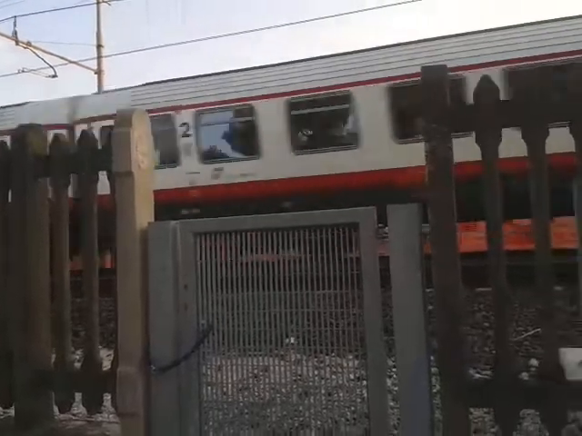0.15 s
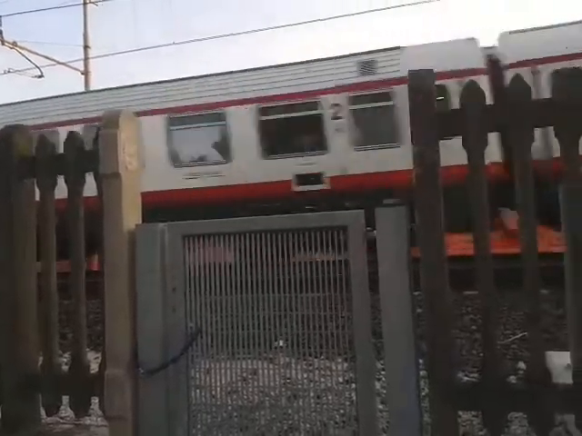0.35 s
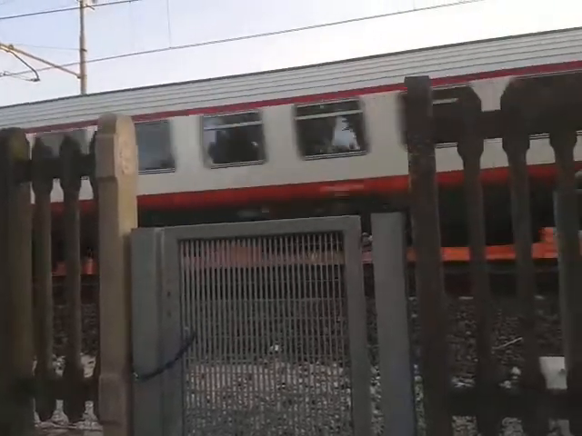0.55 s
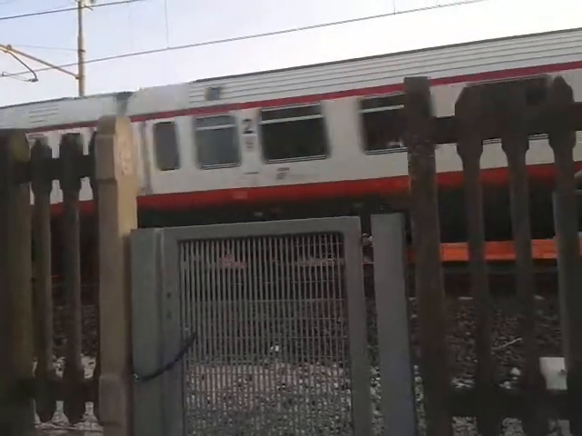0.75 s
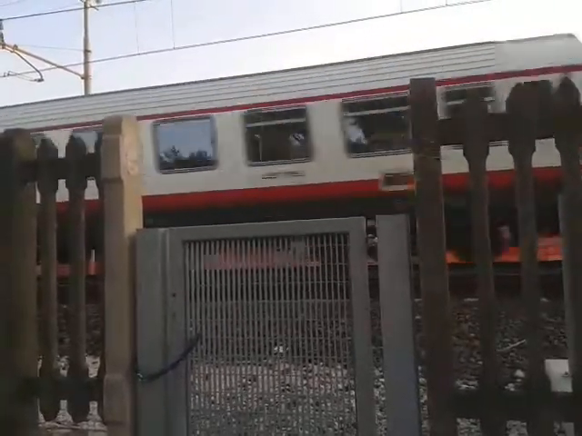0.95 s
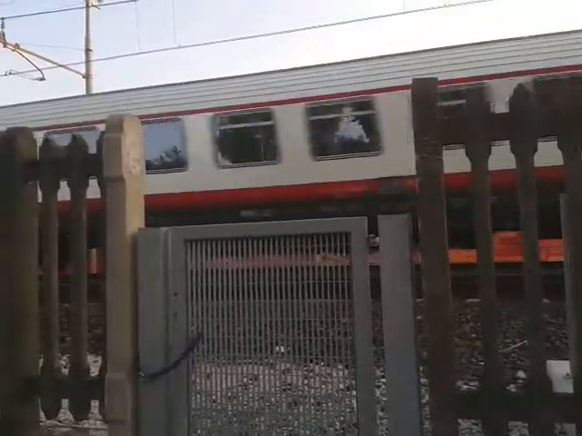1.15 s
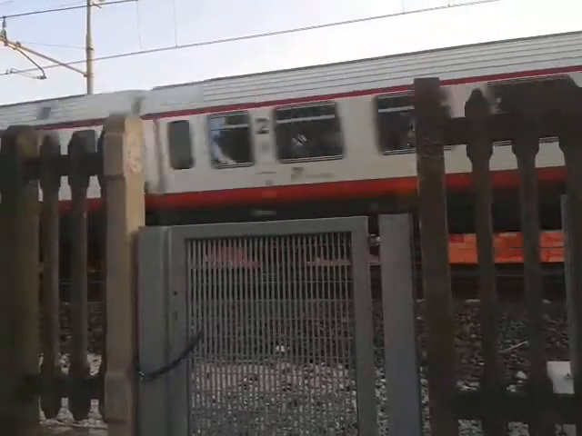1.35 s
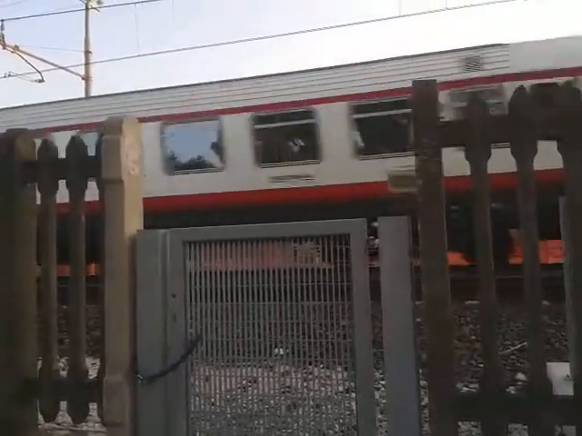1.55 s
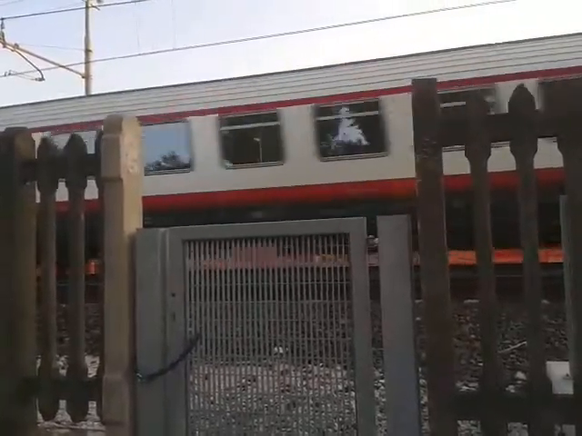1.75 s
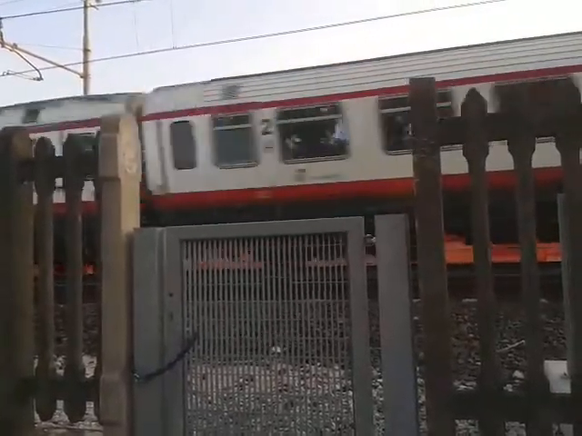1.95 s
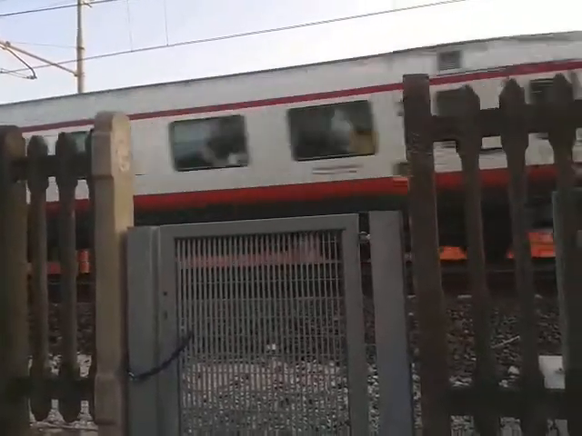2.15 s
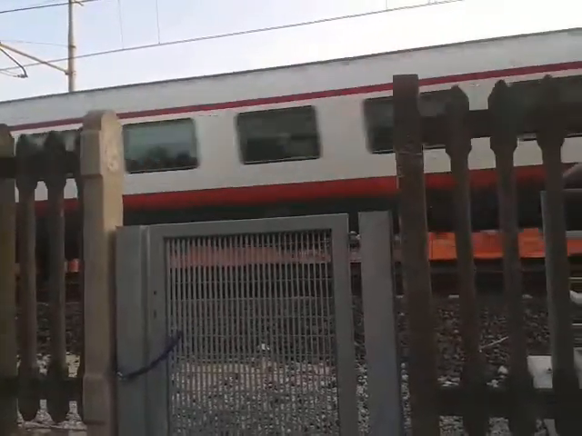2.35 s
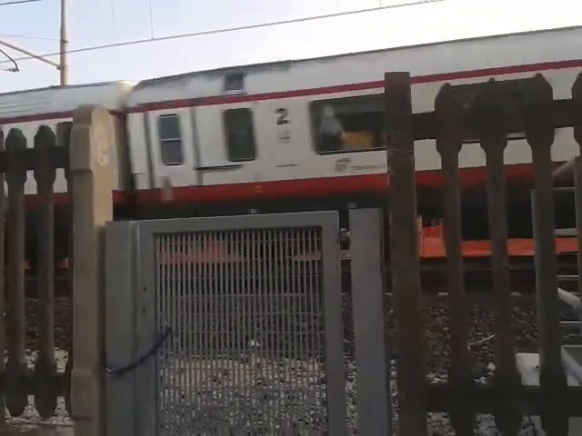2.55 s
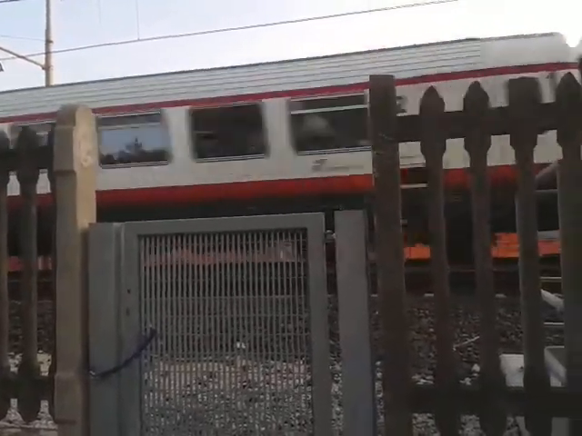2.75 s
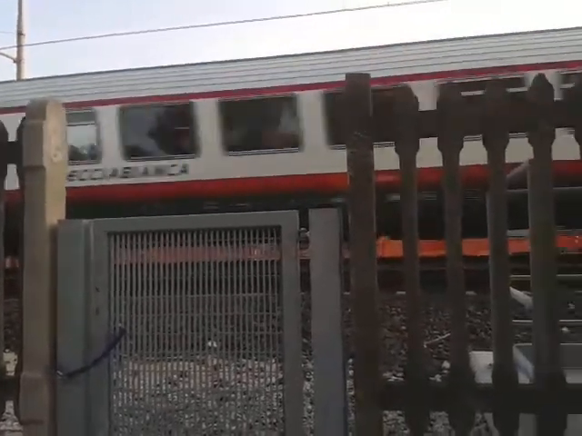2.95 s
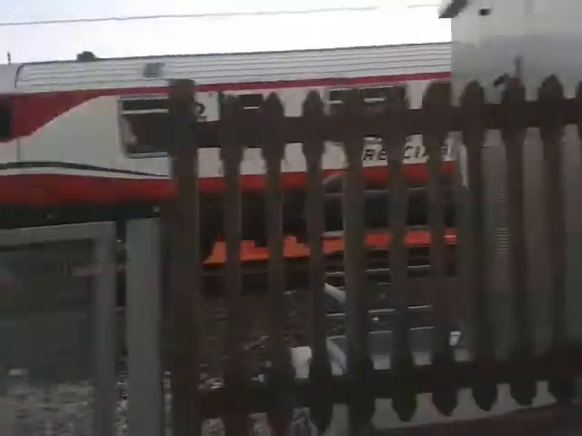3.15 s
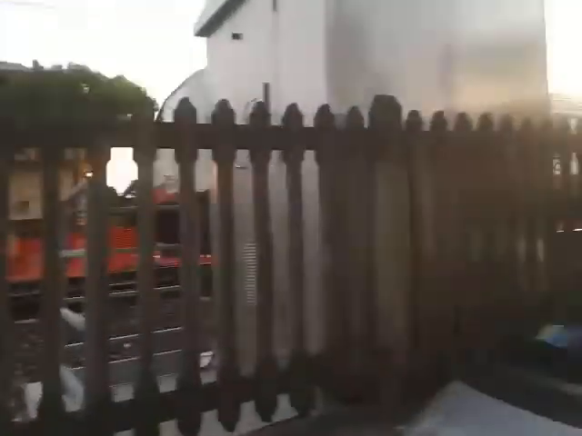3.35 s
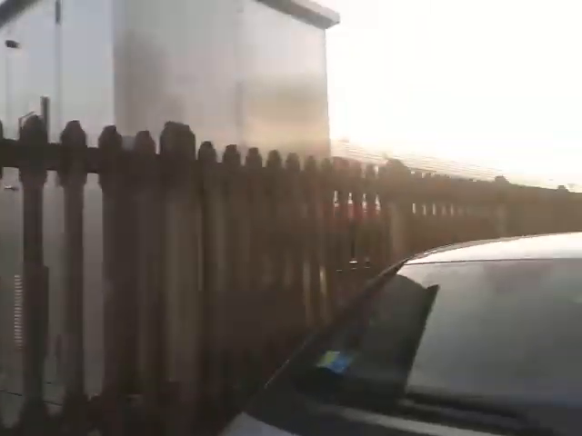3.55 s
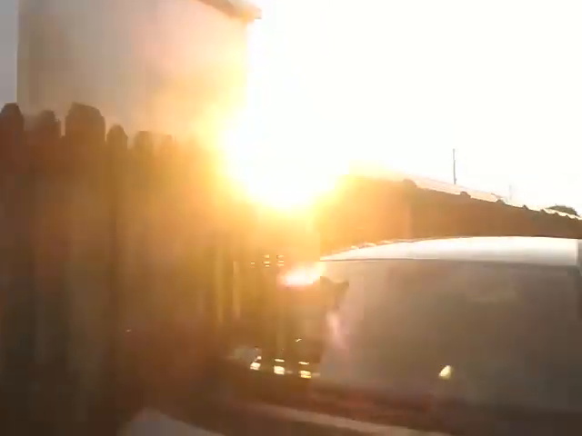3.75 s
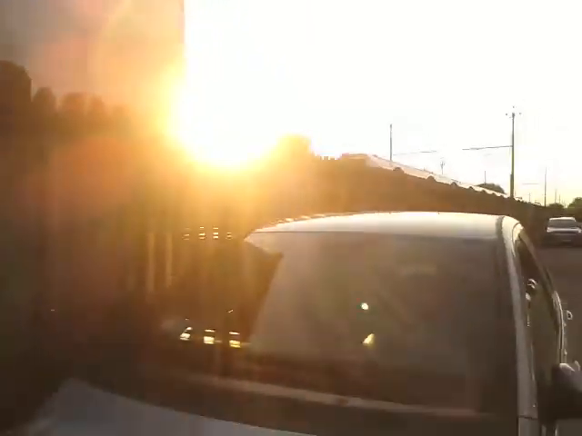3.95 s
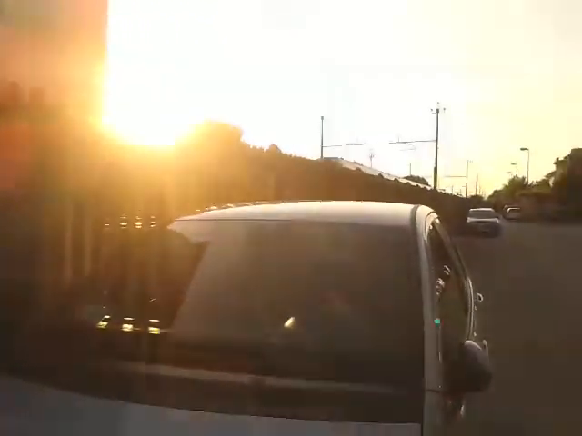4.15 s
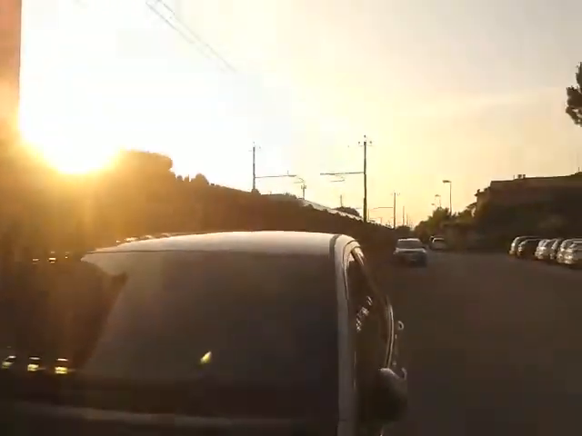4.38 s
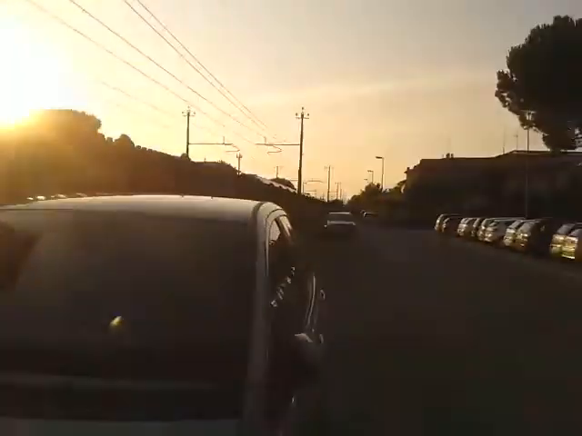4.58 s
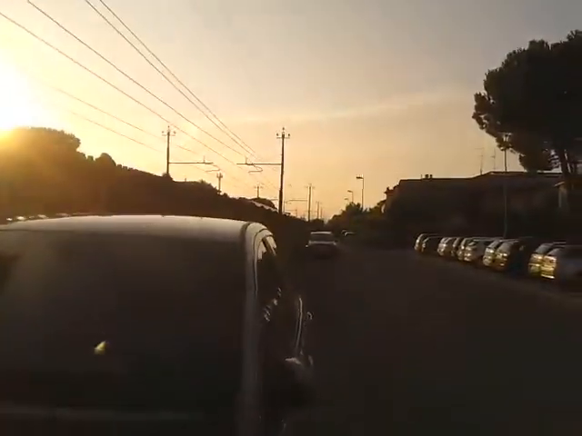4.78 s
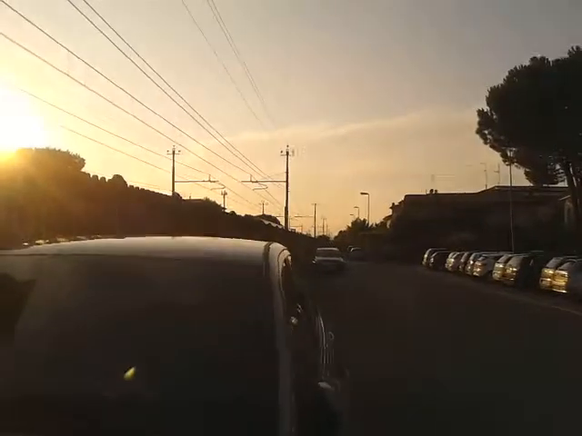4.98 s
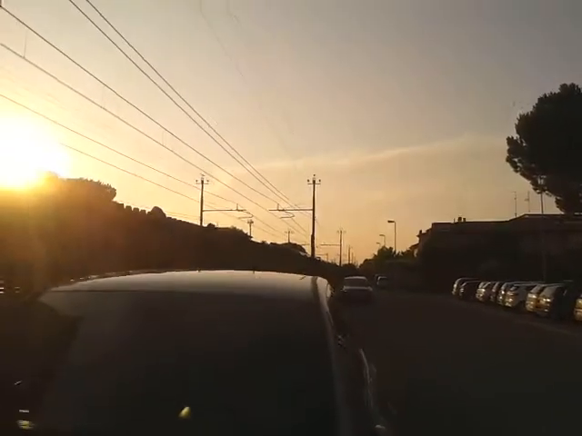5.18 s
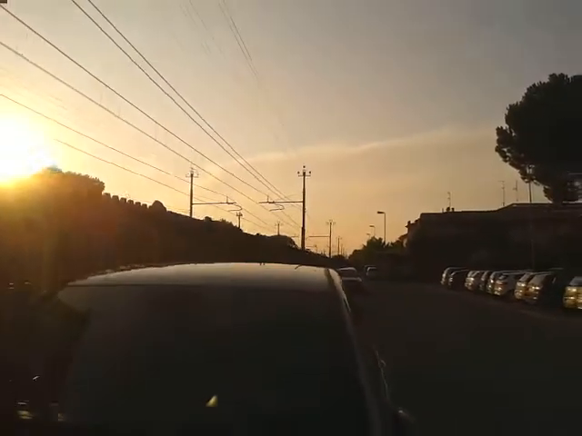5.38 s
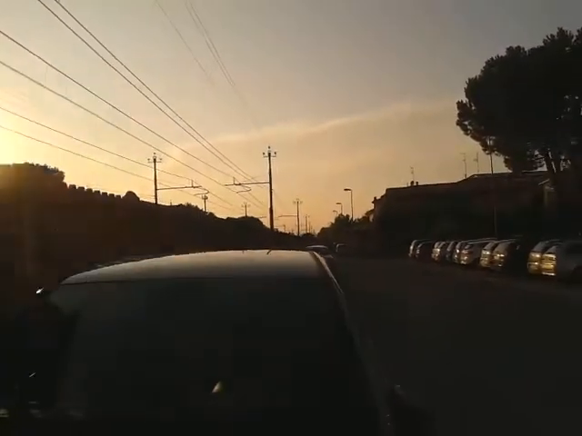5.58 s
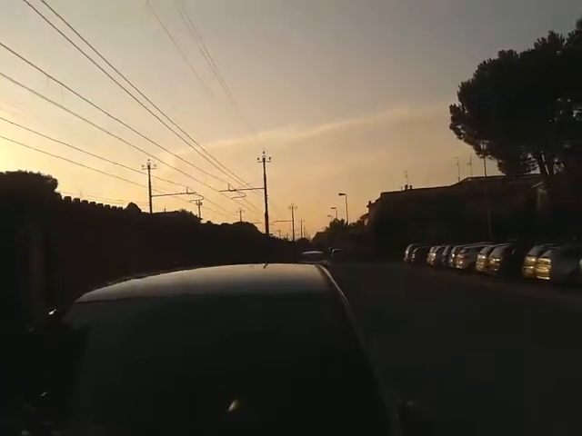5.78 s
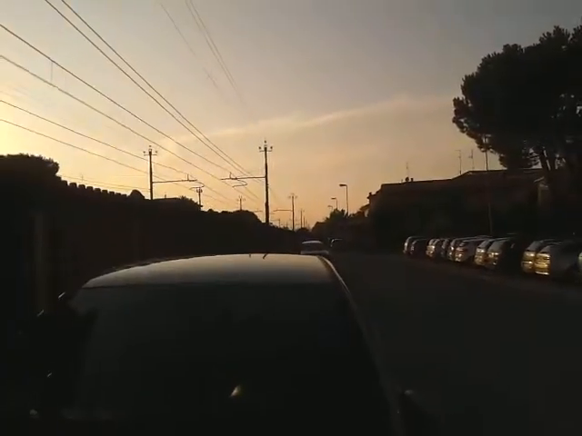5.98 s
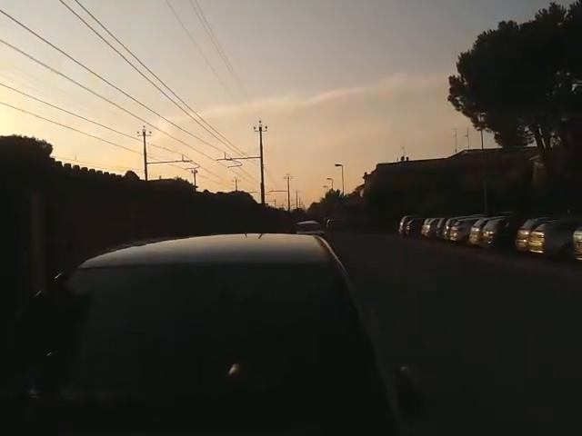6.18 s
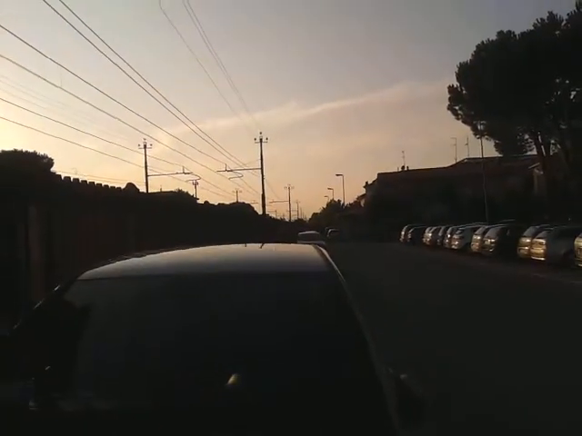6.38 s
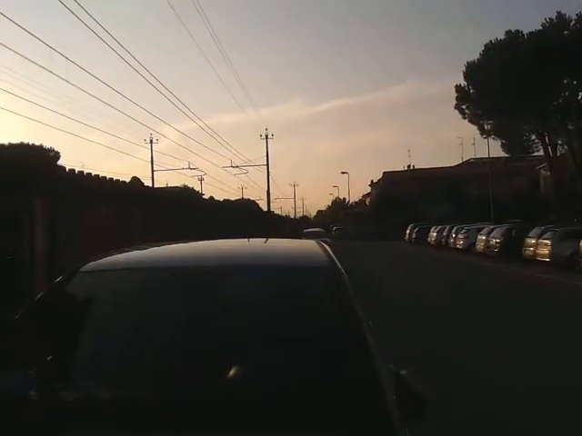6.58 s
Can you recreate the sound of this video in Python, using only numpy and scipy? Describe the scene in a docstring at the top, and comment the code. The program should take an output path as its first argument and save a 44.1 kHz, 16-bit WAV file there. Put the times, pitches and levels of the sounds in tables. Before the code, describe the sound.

Loud close train pass: harsh metallic roar, down-sliding wheel rings, clattering knocks and brief squeaks, dropping suddenly after the last coach and fading away.

```python
"""Electric train passing

An electric passenger train rushes past a fence at speed and recedes along the line. Shaped noise gives
the rumble, roar and hiss of rolling; noise-fed resonances give rail, wheels, frames and rear power car.
Each wheel's ring slides down by Doppler shift; flat spots knock, flanges squeak, tiny slips chatter.
The small microphone overloads on the peaks; after the last coach the rails sing on."""
import sys
import numpy as np
from scipy import signal
from scipy.io import wavfile
from scipy.ndimage import uniform_filter1d

SR = 44100
rng = np.random.default_rng(int(sys.argv[2]) if len(sys.argv) > 2 else 0)


def store_wav(level_fs):
    """Save 16-bit WAV to argv[1]."""
    pcm = np.round(np.clip(np.atleast_2d(level_fs), -1, 1) * 32767)
    wavfile.write(sys.argv[1], SR, pcm.T.astype(np.int16))


N = 291938

TIME = np.arange(N) / SR
FFT_SIZE, HOP = 1024, 256  # samples
BINS = np.fft.rfftfreq(FFT_SIZE, 1 / SR)  # Hz
FRAMES = np.arange(N // HOP + 5) * HOP / SR  # s
TAIL_S, BLEND_S = 3.357, 0.76  # last coach gone by; time constant of the turn to distant colour
HUT_S, HUT_SHUT_S = 3.35, 0.05  # last wheels go behind a lineside hut; time to full screening
TURN_HZ = 15.2  # wheel turns per second


def amp(db):
    """Decibels to gain."""
    return 10 ** (np.asarray(db) / 20)


def evened(x):
    """Scales to rms 1."""
    return x / np.sqrt(np.mean(x ** 2) + 1e-20)


def swell(t, centre_s, half_length_s):
    """Gaussian bell of height 1 as something goes by."""
    return np.exp(-0.5 * ((t - centre_s) / half_length_s) ** 2)


def drift(hz):
    """Complex noise of rms 1, its spectrum falling off beyond hz."""
    f = np.fft.fftfreq(N, 1 / SR)
    phase = 2 * np.pi * rng.random(N)
    z = np.fft.ifft(np.exp(1j * phase) / (1 + (f / hz) ** 2))
    return z / np.std(z)


def ring(hz, width_hz):
    """Resonance of rms 1, fed by random roughness, that follows the pitch hz."""
    turns = np.cumsum(hz * np.ones(N)) / SR
    carrier = np.exp(2j * np.pi * turns)
    return np.sqrt(2) * (drift(width_hz / 2) * carrier).real


def ring_sum(modes):
    """Sum of resonances, one per row (f/Hz, width/Hz, level/dB)."""
    return sum(amp(db) * ring(hz, width_hz) for hz, width_hz, db in modes)


def colour(points):
    """Spectrum in dB on the bins, joined on a log-frequency axis."""
    hz, db = np.transpose(points)
    return np.interp(np.log(BINS + 1), np.log(hz + 1), db)


def band(lo_hz, hi_hz):
    """Steep window over the bins."""
    low_side = 1 + (lo_hz / (BINS + 1)) ** 20
    high_side = 1 + (BINS / hi_hz) ** 20
    return 1 / np.sqrt(low_side * high_side)


def farness(t):
    """0 while the coaches are alongside, towards 1 when heard from far down the line."""
    return 1 - np.exp(-np.maximum(t - TAIL_S, 0) / BLEND_S)


def hidden(t):
    """0 while the last wheels are in view, 1 once the hut screens them."""
    return np.clip((t - HUT_S) / HUT_SHUT_S, 0, 1)


# Carry back along the line as the train draws away; used relative to row 1: [t/s, level/dB]
CARRY = [(3.3, -24), (3.55, -26.0), (4.0, -30.5), (4.45, -33.0), (4.7, -33.5), (5.25, -36), (5.9, -38.5),
         (6.6, -44.0)]


def leaving(t, share, blend_db):
    """Change in dB behind the train: a share of the fading roar, less blend_db as direct sound blends away."""
    fade_db = np.interp(t, *np.transpose(CARRY)) - CARRY[0][1]
    return share * fade_db - blend_db * farness(t)


# Running-gear shake, rougher on some coaches; used relative to USUAL_SHAKING_DB: [t/s, level/dB]
SHAKING = [(0, -26.5), (0.55, -25.5), (0.85, -29.5), (1.72, -30.5), (1.9, -23.5), (2.28, -25),
           (2.52, -27.5), (3.05, -22.0), (3.3, -26.5)]
USUAL_SHAKING_DB = -27
# Uneven ground response in the deep bass, before trim and fade: [t/s, level/dB]
BOOM = [(0, -43), (0.28, -56), (0.42, -42), (1.5, -39.5), (2.0, -35.0), (2.55, -40), (3.1, -39),
        (3.3, -44.0)]
# Bogies passing at the coach ends: [t/s, rail ring level/dB, frame drone level/dB]
BOGIES = [(.38, -23, -37), (1.04, -23, -34), (1.58, -29, -34), (2.19, -22, -24), (2.67, -19, -35),
          (3.2, -29, -32.5)]
HISS_LEAD_S, HISS_SWELL_S, HISS_SWELL_DB = 0.16, 0.14, 1.5  # hiss swells just ahead of the bogies


def rolling_levels():
    """Levels in dB per frame: ground takes its own course, bogies and rails follow the shake; all fade."""
    t = FRAMES
    shake_db = np.interp(t, *np.transpose(SHAKING)) - USUAL_SHAKING_DB
    passes = sum(swell(t, s - HISS_LEAD_S, HISS_SWELL_S) for s, _, _ in BOGIES)
    boom_db = np.interp(t, *np.transpose(BOOM)) + 0.76 + leaving(t, share=0.37, blend_db=-0.7)
    rumble_db = -26.8 + 1.31 * shake_db + leaving(t, share=1.02, blend_db=4.5)
    roar_db = -21 + 0.31 * shake_db + leaving(t, share=1.043, blend_db=0.9)
    hiss_db = -22 + HISS_SWELL_DB * passes - 3 * hidden(t) + leaving(t, share=0.9, blend_db=7)
    return boom_db, rumble_db, roar_db, hiss_db


def rolling_layer(level_db, shape_db, extent, core, unrest, patchy_db, flicker_db):
    """Noise over the bins of extent, level set inside core, in shifting patches with a shared flicker."""
    real, imag, patches = rng.standard_normal((3, len(FRAMES), len(BINS)))
    patches = uniform_filter1d(patches, size=8, axis=0)
    patches = evened(uniform_filter1d(patches, size=5, axis=1))
    flicker = evened(uniform_filter1d(rng.standard_normal(len(FRAMES)), size=3))[:, None]
    shape = amp(shape_db)
    shape = shape * extent / np.linalg.norm(shape * core, axis=1, keepdims=True)
    unrest_db = unrest * (patchy_db * patches + flicker_db * flicker)
    z = (real + 1j * imag) * shape * amp(level_db[:, None] + unrest_db)
    return signal.istft(z.T, nperseg=FFT_SIZE, noverlap=FFT_SIZE - HOP)[1][:N]


def wheel_throb(depth_db):
    """Slightly uneven wheels press harder once a turn; far away they blur together."""
    turns = TURN_HZ * TIME + 0.61 * drift(1.9).real
    return amp(depth_db * (1 - farness(TIME)) * np.sin(2 * np.pi * turns))


# Relative colour of boom, rumble and roar, alongside and far: [f/Hz, level/dB]
ROAR_NEAR = [(30, -28), (60, -23), (130, -17.5), (200, -10), (250, -1), (390, -4), (530, -16), (700, -7.5),
             (850, -7.5), (1030, -3.5), (1280, -11.5), (1530, -4.5), (1780, -3.5), (2050, -3)]
ROAR_FAR = [(30, -22.0), (55, -4), (80, 1), (125, -22), (165, -2.5), (210, 0), (330, -2), (450, -4),
            (800, -0.5), (1020, -3.5), (1270, -5.5), (1520, -1), (1900, -6), (2100, -9)]
# Relative colour of the hiss, alongside and far: [f/Hz, level/dB]
HISS_NEAR = [(2000, -9.5), (2400, -2), (2800, -1), (3350, -6), (3800, -10.5), (4900, -11.5), (5450, -8.5),
             (6000, -13.0), (6500, -18), (7400, -22), (9000, -32.5), (13000, -44.5), (15600, -64)]
HISS_FAR = [(2000, -0.5), (2350, -0.5), (2750, -1.5), (3100, -5), (3750, -11.0), (4500, -12), (5500, -11.5),
            (6100, -21), (7400, -27.5), (9000, -35.5), (12000, -44.5), (15600, -59)]


def rolling():
    """Rough steel on steel shakes ground, bogies and rails; the colour changes as the train draws away."""
    boom_db, rumble_db, roar_db, hiss_db = rolling_levels()
    far = farness(FRAMES)[:, None]
    low = (1 - far) * colour(ROAR_NEAR) + far * colour(ROAR_FAR)
    high = (1 - far) * colour(HISS_NEAR) + far * colour(HISS_FAR)
    # alongside, part of the energy near the wheel resonances goes into distinct rings
    high = high - 2.7 * (1 - far) * band(2520, 2960)
    ground, bogies, rails = band(15, 153), band(156, 472), band(488, 1790)
    steel, steel_core = band(1940, 18000), band(4300, 8000)
    unrest = 1 - 0.9 * far  # distance blends all the wheels into a smooth wash
    boom = rolling_layer(boom_db, low, ground, ground, unrest, patchy_db=2.7, flicker_db=-0.6)
    rumble = rolling_layer(rumble_db, low, bogies, bogies, unrest, patchy_db=0.47, flicker_db=2.0)
    roar = rolling_layer(roar_db, low, rails, rails, unrest, patchy_db=1.3, flicker_db=0.43)
    hiss = rolling_layer(hiss_db, high, steel, steel_core, unrest, patchy_db=2.08, flicker_db=0.64)
    return boom + (rumble + roar) * wheel_throb(depth_db=0.7) + hiss


# Bogie frame resonances, relative to the drone level: [f/Hz, width/Hz, level/dB]
FRAME_MODES = [(165, 37, -12), (249, 36, -0.5)]
# Low hums that carry from down the line, relative to the rumble: [f/Hz, width/Hz, level/dB]
FAR_HUMS = [(78.7, 24, -11.5), (201, 29, -7)]
DRONES_DB, DRONE_SWELL_S = -46.5, 0.13  # level kept up between bogies; half length round each pass


def drones():
    """Narrow low resonances stand out of the rumble: bogie frames alongside, hums from afar."""
    _, rumble_db, _, _ = rolling_levels()
    far_gain = farness(TIME) * amp(np.interp(TIME, FRAMES, rumble_db))
    passes = sum(amp(db) * swell(TIME, s, DRONE_SWELL_S) for s, _, db in BOGIES)
    frame_gain = (amp(DRONES_DB) + passes) * (1 - farness(TIME))
    return frame_gain * ring_sum(FRAME_MODES) + far_gain * ring_sum(FAR_HUMS)


RAIL_HZ, RAIL_WIDTH_HZ = 2733, 190
RINGS_DB, RAIL_SWELL_S = -33.5, 0.11  # level kept up between bogies; half length round each pass


def rail(hut_db=-10):
    """The rail rings under each pair of bogies, at a fixed pitch since it does not move."""
    passes = sum(amp(db) * swell(TIME, s, RAIL_SWELL_S) for s, db, _ in BOGIES)
    fade = amp(hut_db * hidden(TIME) + leaving(TIME, share=0.79, blend_db=-10))
    return (amp(RINGS_DB) + passes) * fade * ring(RAIL_HZ, RAIL_WIDTH_HZ)


# Ringing wheels: [t/s abreast, f/Hz at rest, level/dB before trim_db]
WHEELS = [(0.0, 2547, -15.5), (0.0, 2995, -16), (.16, 2400, -21), (.27, 2913, -19.5), (.74, 3145, -21),
          (1.04, 2780, -19.5), (1.37, 3070, -21), (1.53, 2840, -20), (1.86, 2670, -17), (2.07, 4900, -24),
          (2.13, 2855, -17.5), (2.38, 2470, -15), (2.42, 3325, -18.5), (2.55, 4850, -30), (2.73, 2350, -18),
          (3.14, 2367, -17)]
SPEED_M_S, TRACK_DISTANCE_M, SOUND_SPEED_M_S = 46, 10, 343
WHEEL_LAG_S, WHEEL_SWELL_S = 0.072, 0.096  # loudest just after abreast; half length of the swell


def wheels(width_hz=85, hut_db=-15, trim_db=-2.5):
    """Each wheel's ring swells and fades while the Doppler shift pulls it down."""
    out = np.zeros(N)
    for abreast_s, rest_hz, db in WHEELS:
        along_m = SPEED_M_S * (TIME - abreast_s)
        retreat_m_s = SPEED_M_S * along_m / np.hypot(along_m, TRACK_DISTANCE_M)
        heard_hz = rest_hz / (1 + retreat_m_s / SOUND_SPEED_M_S)
        gain = amp(db) * swell(TIME, abreast_s + WHEEL_LAG_S, WHEEL_SWELL_S)
        out += gain * ring(heard_hz, width_hz)
    return out * amp(hut_db * hidden(TIME) + trim_db)


def chatter(count=170, centre_hz=2850, spread_hz=300, level_db=-23, spread_db=2, rise_s=0.01):
    """While the coaches are alongside, many tiny slips each set one wheel mode ringing for an instant."""
    out, t = np.zeros(N), np.arange(4000) / SR
    ping = t / rise_s * np.exp(1 - t / rise_s)
    starts_s = rng.uniform(0, TAIL_S, count)
    pitches, sizes = rng.standard_normal((2, count))
    for s, pitch, size in zip(starts_s, pitches, sizes):
        hz = centre_hz + spread_hz * np.clip(pitch, -1.9, 1.9)
        start = round(s * SR)
        gain = amp(level_db + spread_db * size)
        out[start:start + len(t)] += gain * ping * np.sin(2 * np.pi * hz * t)
    return out


WHINE_HZ, WHINE_WIDTH_HZ, WHINE_DB = 15154, 12, -77
FLOOR_DB = -68


def background():
    """A thin whistle as a very narrow resonance, and microphone hiss as white noise."""
    whine = amp(WHINE_DB) * ring(WHINE_HZ, WHINE_WIDTH_HZ)
    return whine + amp(FLOOR_DB) * rng.standard_normal(N)


# Flat spots striking the rail while near: [t/s first blow, t/s last blow, level/dB]
FLATS = [(0.096, .28, -10.5), (.371, 0.35, -12), (2.013, 2.207, -11), (2.348, 2.77, -15),
         (2.729, 2.729, -13), (3.095, 3.294, -8.5)]
# What a blow rings with, relative levels: [f/Hz, width/Hz, level/dB]
BLOW_MODES = [(287, 140, -11.5), (747, 250, -8), (1022, 320, -4), (1740, 220, -12), (2754, 820, 2),
              (5390, 1200, -7.5)]


def knocks(rise_s=0.0014, t60_s=0.098):
    """A flat spot strikes about once a turn; each blow sets wheel, bogie and rail rattling for a moment."""
    force = np.zeros(N)
    for first_s, last_s, db in FLATS:
        blows = 1 + round(abs(last_s - first_s) * TURN_HZ)
        for s in np.linspace(first_s, last_s, blows):
            age_s = np.maximum(TIME - s, 0)
            force += amp(db - 60 * age_s / t60_s) * (1 - np.exp(-age_s / rise_s))
    return force * evened(ring_sum(BLOW_MODES))


# Flanges catching the rail head: [t/s, f/Hz, half length/s, level/dB]
SQUEAKS = [(0.28, 2760, .003, -7), (0.447, 2753, .005, -11), (1.138, 7330, 0.018, -24),
           (1.413, 4830, 0.019, -21), (1.578, 5300, 0.012, -20.5), (2.113, 5230, 0.02, -21),
           (2.115, 4610, 0.018, -21.5), (3.172, 5500, .025, -19), (3.337, 5437, 0.01, -12.5),
           (3.352, 2644, 0.0079, -9), (6.3, 6800, .03, -62)]


def squeaks(waver=0.00874, waver_hz=78):
    """Brief, nearly pure stick-slip tones, all sharing one slight pitch waver."""
    out = np.zeros(N)
    wander = 1 + waver * drift(waver_hz).real
    for s, hz, half_length_s, db in SQUEAKS:
        tone = np.sin(2 * np.pi * np.cumsum(hz * wander) / SR)
        out += amp(db) * swell(TIME, s, half_length_s) * tone
    return out


FAN_S, FAN_SWELL_S = 3.28, 0.44  # pass; half length
FAN_HZ, FAN_WIDTH_HZ, FAN_DB = 479.4, 530, -30.5


def power_car():
    """The rear power car blows air: a broad, hollow rush fills in between rumble and roar."""
    return amp(FAN_DB) * swell(TIME, FAN_S, FAN_SWELL_S) * ring(FAN_HZ, FAN_WIDTH_HZ)


def scene():
    """Everything, heard from one place beside the line."""
    steady = rolling() + drones() + rail() + background()
    passing = wheels() + chatter() + knocks() + squeaks() + power_car()
    return (steady + passing)[None]


def record(dry, knee=0.69, headroom=0.01, low_cut_hz=48, edge_hz=15720):
    """The small microphone loses the deep bass and flattens the loudest peaks; then the band limit."""
    high_pass = signal.butter(4, low_cut_hz / (SR / 2), "high", output="sos")
    thin = signal.sosfilt(high_pass, dry)
    clean = np.clip(thin, -knee, knee)
    clipped = clean + headroom * np.tanh((thin - clean) / headroom)
    low_pass = signal.firwin(1023, edge_hz, window=("kaiser", 9), fs=SR)
    return signal.oaconvolve(clipped, low_pass[None], "same")


dry = scene()
out = record(dry)
store_wav(out)
```